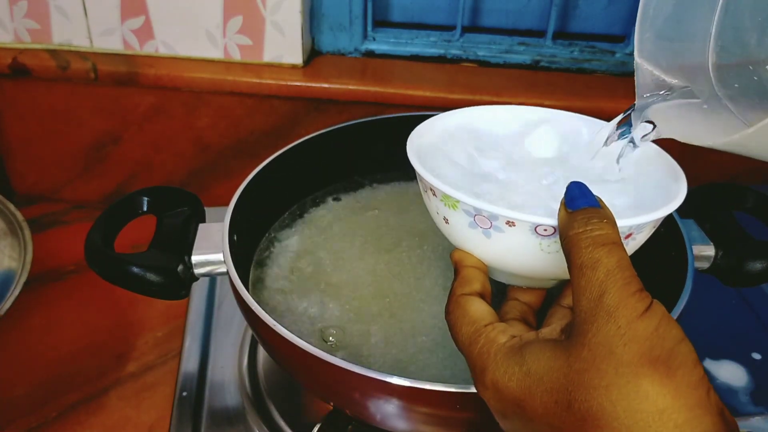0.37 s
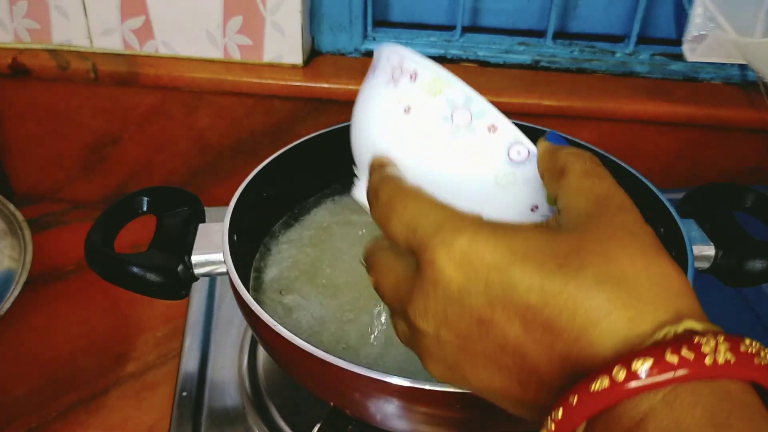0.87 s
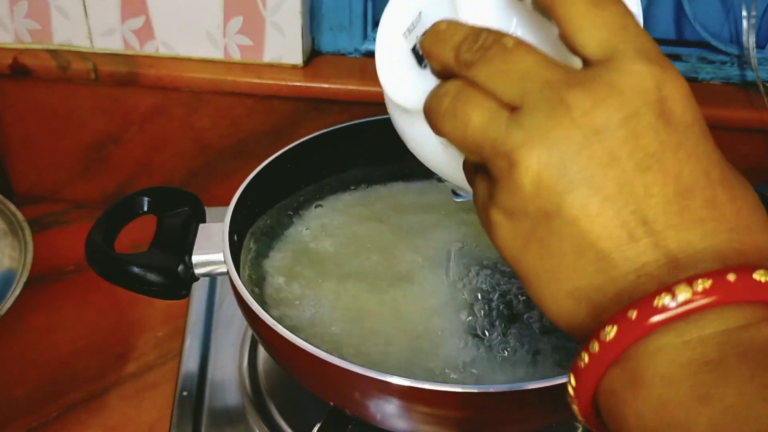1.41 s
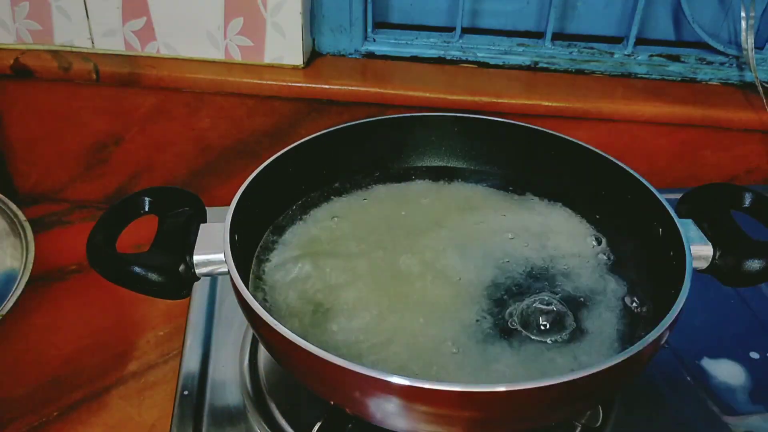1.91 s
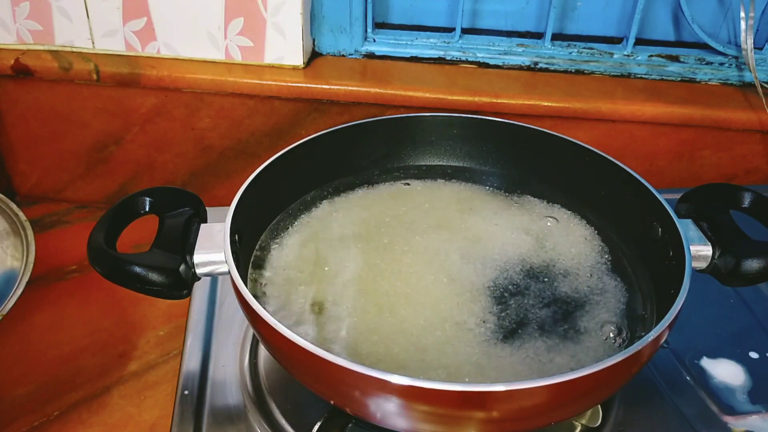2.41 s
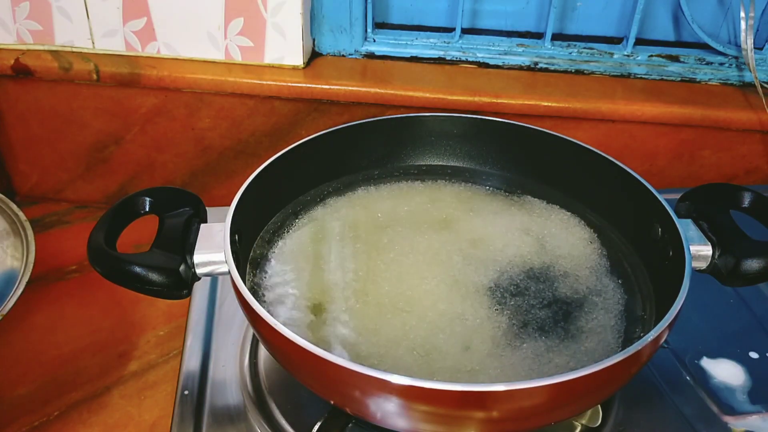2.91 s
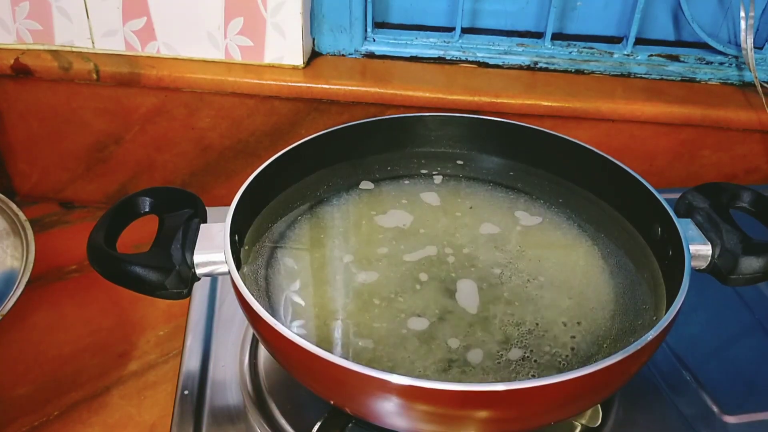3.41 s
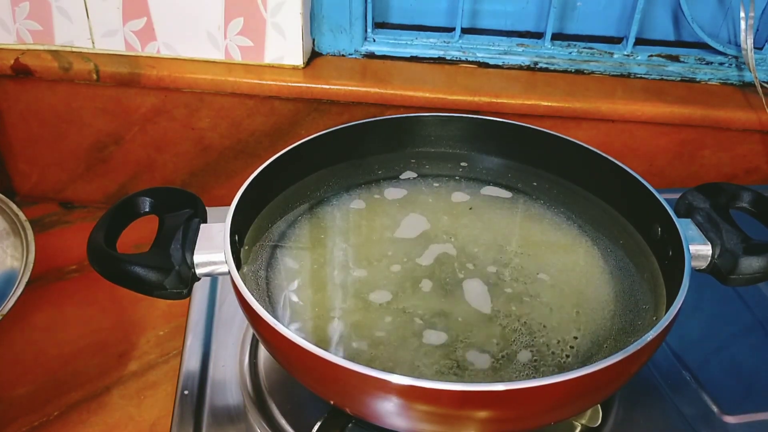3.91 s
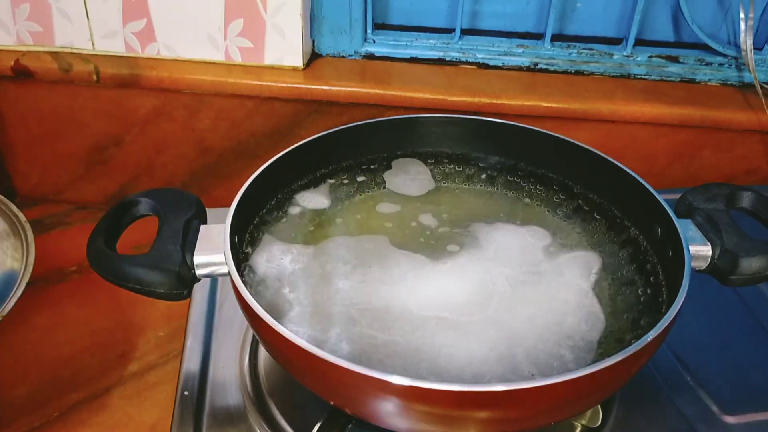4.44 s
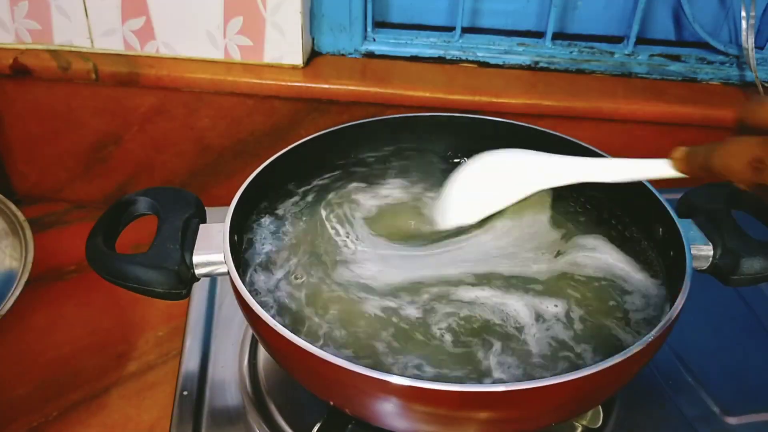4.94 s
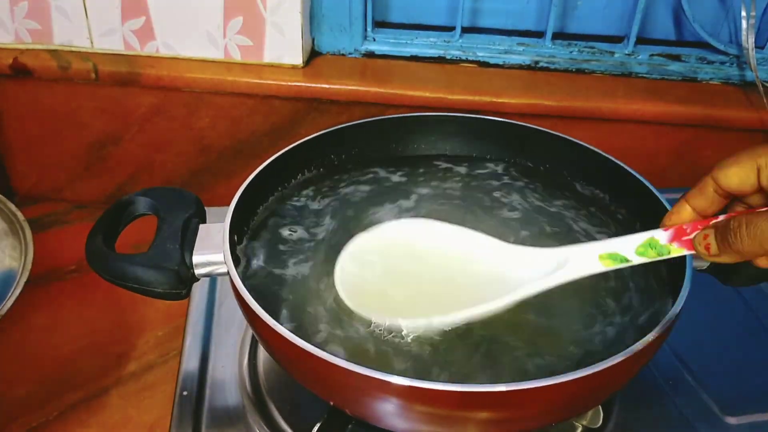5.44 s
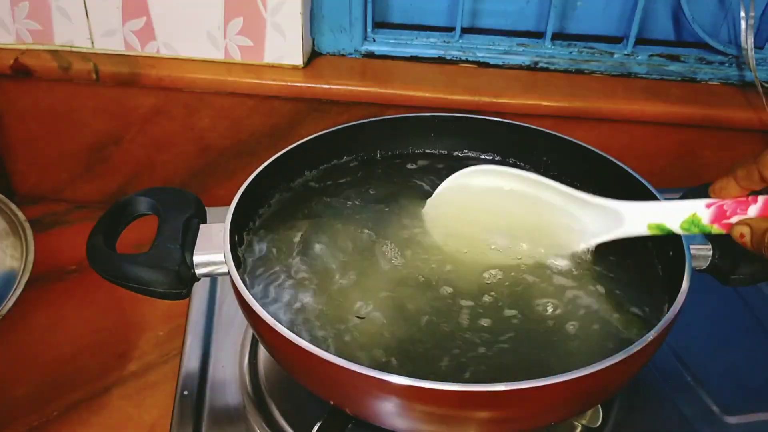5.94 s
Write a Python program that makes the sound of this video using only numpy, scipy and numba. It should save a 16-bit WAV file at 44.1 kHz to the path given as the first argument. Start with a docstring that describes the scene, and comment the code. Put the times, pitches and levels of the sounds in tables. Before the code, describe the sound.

Close in a small kitchen, a soft gurgling pour gives way to a bubbly splash as a bowl is tipped into a pan. A jug lands with a hollow thud, followed by sharp knocks after a tiny gap. Quiet murmur and faint insect hiss remain, with light rustling, before a plastic ladle scrapes and taps wet sugar on the pan floor.

```python
"""Water runs from a jug into a bowl, a stream of coloured noise and bubbles, and is tipped into a pan with a splash.
The jug lands with a hollow thud of decaying modes; small things knock, tick and rustle as shaped bursts of grit.
Then a plastic ladle scrapes wet sugar on the pan floor: grit rings pan and ladle, taps ring briefly, syrup bubbles.
Filtered-noise room murmur and throbbing insect hiss lie under it all, with one far bird note.
A cut between two shots near 2.2 s leaves a few milliseconds of silence."""
import sys
import numpy as np
from scipy import signal
from scipy.fft import rfft, irfft, next_fast_len
from scipy.io import wavfile
from scipy.ndimage import uniform_filter1d
from numba import njit

SR = 44100
rng = np.random.default_rng(int(sys.argv[2]) if len(sys.argv) > 2 else 0)


def to_linear_factor(level_db):
    """Convert decibel levels (scalar or array-like) to linear amplitude factors."""
    exponent = np.asarray(level_db, float) / 20
    return 10 ** exponent


def store_pcm(level_fs):
    """Save levels as 16-bit WAV."""
    pcm = np.round(np.clip(level_fs, -1, 1) * 32767).astype(np.int16)
    wavfile.write(sys.argv[1], SR, np.atleast_2d(pcm).T)


N = 267687
T = np.arange(N) / SR

# room murmur: t/s, gain/dB
ROOM_GAIN = [(0, -53), (1.7, -47), (2.17, -47), (2.4, -49), (2.55, -50), (2.9, -52.5), (3.3, -53.5),
             (4.1, -54.5), (4.6, -57.5), (5.5, -55), (6.07, -55.5)]
# murmur spectrum: f/Hz, relative gain/dB
ROOM_COLOUR = [(25, -28.5), (55, -9), (90, 1.5), (120, 2), (160, 0.5), (215, -2), (290, 2.5), (400, -7.5),
               (600, -5.5), (1000, -13), (2000, -16), (4000, -23), (16000, -24.5)]
# insect bands: f/Hz, width of each of two resonances/Hz, rms level/dB
INSECTS = [(6883, 500, -60), (5140, 790, -68), (11100, 990, -71)]
INSECT_THROB_HZ, INSECT_PULSE_HZ, INSECT_DEPTH_DB = 16, 31, 3.5
# far bird note: t/s, f/Hz, peak level/dB, length/s
BIRD_NOTES = [(2.809, 3365, -50.5, 0.034)]
# knocks of small things on the counter: t/s, gain/dB, main ring f/Hz, edge re gain/dB, swell scale/s
KNOCKS = [(2.115, -53, 1250, -0.5, 0.022), (2.204, -44.5, 1720, -13, 0.026),
          (2.219, -38.5, 1370, -14.5, 0.037), (2.287, -28.5, 1320, -39, 0.028),
          (2.313, -40, 1290, -30, 0.024), (2.329, -42, 748, -16, .023), (2.448, -50.5, 3440, 5, 0.015),
          (2.706, -58, 1140, 1, .027), (3.008, -60, 1010, -1.5, 0.038), (3.334, -47, 1190, -11.5, 0.023),
          (3.408, -62, 1270, -12, 0.014)]
KNOCK_BODY_DB, KNOCK_BODY_SLOPE = 1, -0.32  # body re ring at -57 dB; dB per dB louder
# rustles of cloth or paper: t/s, gain/dB
RUSTLES = [(3.462, -65), (3.491, -51.5), (3.541, -50), (3.565, -49), (3.61, -49), (3.642, -53.5),
           (3.686, -54.5), (3.736, -53), (3.778, -58), (3.821, -59), (3.892, -51.5), (3.932, -53.5),
           (4.004, -60), (4.075, -63.5), (4.175, -61.5)]
RUSTLE_SCALE_S, RUSTLE_HZ, RUSTLE_BODY_DB, RUSTLE_EDGE_DB = 0.041, 2150, -1.5, -1.6
# short rings of hard things touching: t/s, peak level/dB, f/Hz, ring length/cycles
TICKS = [(2.116, -35.5, 825, 5.2), (2.123, -24.5, 3500, 3.1), (2.218, -15.5, 485, 12.1),
         (2.297, -10.5, 1350, 3), (2.304, -16.5, 1500, 9.5), (2.338, -21.5, 420, 4.2),
         (2.449, -38, 8440, 44), (2.457, -35, 3600, 4.8), (2.457, -29, 8740, 92), (2.735, -39, 229, 13),
         (3.338, -26.5, 1200, 0.76), (5.591, -28, 8500, 3.8)]
# brief 35 ms puff of hiss late in the rustling: start/s, end/s, rms level before flutter/dB
PUFF = (4, 4.035, -60.5)
# grit and spray spectrum above the main rings: f/Hz, relative gain/dB
EDGE_COLOUR = [(1500, -69), (2600, 11), (4000, 10), (16000, 1)]
# cut between two shots: silence starts/s, silent until/s, fully back/s
CUT = (2.180, 2.187, 2.196)
THUD_S, JUG_DB = 1.7215, -8.5
# jug and counter-top modes: f/Hz, level re JUG_DB/dB, t60/s
JUG_MODES = [(93.3, -13, 0.49), (153.7, -10, 0.21), (194, -9.5, 0.14), (254.4, -13.5, 0.36),
             (283, 3.5, 0.26), (306, -9.5, 0.25), (332, -2.5, 0.13), (458, -13.5, 0.15), (563, -27, 0.45),
             (715, -17.5, 0.27), (887, -21, .2), (1120, -31, 0.074), (1385, -19, 0.12),
             (1800, -16.5, 0.041), (2880, -10.5, 0.019)]
# room answer to the thud: f/Hz, width before scaling/Hz, initial level/dB, t60/s
THUD_TAIL = [(100, 11, -29, 0.25), (159, 42, -20.5, 0.43), (275, 30, -31.5, 1.28), (570, 360, -26.5, 0.42),
             (1200, 770, -26.5, 0.29), (2600, 6600, -27.5, 0.075), (8500, 5500, -40.5, 0.07),
             (13900, 7100, -40, 0.65)]
# stream of water: t/s, gain/dB
POUR_GAIN = [(0.0, -43), (0.35, -47), (0.78, -48), (0.98, -42), (1.14, -42.5), (1.47, -50.5), (2.17, -55)]
# rush spectrum: f/Hz, relative gain/dB
RUSH_COLOUR = [(25, -54), (58, -35), (88, 8), (120, -14.5), (165, 8), (215, -9.5), (285, 5), (550, -7.5),
               (1100, -3.5), (1800, -11.5), (3000, -14), (4500, -21), (16000, -20)]
POURING_S, TIPPING_S, STIRRING_S = (0, 2.18), (0.78, 1.62), (4.6, 6.07)  # start, end
GURGLE_DB = -8.5
# surges as the bowl tips: t/s, peak gain/dB, fade/(dB/s)
SURGES = [(.799, -39.5, 63), (0.829, -30, 109), (.865, -37, 138), (.90, -45, 106), (0.954, -36, 208),
          (1.047, -40, 90), (1.13, -46.5, 45), (1.281, -40.5, 147), (1.359, -49.5, 58)]
SURGE_ATTACK_S, SPRAY_DB = 0.0052, -7
# pan resonances under the falling water: f/Hz, width/Hz, gain/dB
PAN_MODES = [(780, 230, 7), (1500, 150, 5.5), (2100, 310, 12), (2880, 180, -1), (3360, 200, 6)]
# single clear bubbles: t/s, peak level/dB, f/Hz, ring length/cycles
BUBBLES = [(.80, -32.5, 1500, 45), (.818, -34, 2700, 57), (.82, -34, 3570, 66), (.845, -34, 2030, 37),
           (.855, -28.5, 2850, 43), (.86, -37, 810, 16), (.895, -32, 2100, 66), (.93, -30.5, 1600, 17),
           (.96, -30, 1500, 13), (.963, -33.5, 4860, 55), (1.015, -34, 2600, 18), (1.048, -35, 732, 49),
           (1.049, -33.5, 3390, 84), (1.075, -38, 824, 26), (1.10, -36, 2600, 18), (1.11, -34, 4970, 70),
           (1.16, -38.5, 767, 33), (1.197, -31.5, 6600, 23), (1.195, -32, 1090, 4.8),
           (1.22, -31, 1200, 4.9), (1.27, -38, 2100, 45), (1.345, -40, 2100, 25), (1.53, -42, 1100, 3.6),
           (1.254, -29.5, 2150, 37), (1.295, -35.5, 3630, 97), (1.30, -36, 2110, 40), (1.41, -35, 1200, 10),
           (1.439, -30.5, 1200, 4.4), (1.576, -35.5, 1060, 3.3), (1.602, -39, 1100, 7.4),
           (5.631, -32.5, 529, 13.6), (5.685, -44, 2600, 39)]
# droplets spattering near the microphone: t/s, peak level/dB
SPATTER = [(.843, -27), (.856, -23), (0.875, -20), (.90, -32), (.914, -35), (.961, -36), (0.985, -33),
           (1.05, -29), (1.163, -33), (1.377, -44)]
SPATTER_HZ, SPATTER_CYCLES = 8500, 17
# syrup moving round the ladle: start/s, length/s, gain/dB
SLOSHES = [(4.812, 0.31, -46), (5.125, 0.32, -47.5), (5.556, 0.201, -57)]
SLOSH_RAMP_S, WASH_DB = 0.013, -4
# ladle and pan-floor resonances: f/Hz, width/Hz, gain/dB
LADLE_MODES = [(920, 39, -10), (1200, 14, -6), (1493, 20, -1.5), (1700, 38, -4), (1800, 74, -1),
               (2700, 320, 6.5)]
# ladle strokes, dry grit bright, wet dull: t/s, gain/dB, swell scale/s, edge re gain/dB
STROKES = [(4.616, -44, 0.034, -8), (4.642, -31.5, .015, -7), (4.654, -40, 0.023, -9.5),
           (4.712, -61, .017, -4), (4.819, -46, 0.025, -8.5), (4.847, -36, 0.033, -38),
           (4.866, -33.5, 0.011, -12.5), (4.88, -27, 0.011, -26), (4.889, -44, 0.02, -11),
           (4.938, -40.5, 0.052, -18.5), (4.985, -50.5, 0.036, -19), (5.025, -44, 0.049, -26),
           (5.048, -28.5, 0.022, -7.5), (5.067, -32.5, 0.0098, -3.5), (5.084, -31, 0.013, -33),
           (5.124, -34.5, .016, -16.5), (5.144, -27, .015, -9), (5.161, -26.5, 0.014, -15),
           (5.174, -28, 0.024, -17), (5.209, -29.5, 0.027, -27), (5.24, -49, 0.062, -20),
           (5.284, -28.5, .011, -19), (5.292, -20.5, .011, -9), (5.303, -28, .019, -13.5),
           (5.355, -37, 0.025, -26), (5.385, -43.5, 0.016, -8), (5.402, -40, 0.011, -13),
           (5.424, -53, 0.028, -33), (5.481, -57, 0.012, -1.5), (5.5, -60, 0.0087, -8),
           (5.547, -61, .012, -4), (5.585, -67, 0.015, 6), (5.637, -50.5, 0.031, -8),
           (5.665, -56.5, 0.037, 3.5), (5.735, -57.5, 0.019, -3.5), (5.87, -60, 0.018, -12),
           (5.89, -52, .015, -3.5), (5.948, -49, 0.036, -13)]
STROKE_HZ, STROKE_HZ_PER_DB = 1650, 17  # ring at 0 dB edge; brighter strokes ring higher
STROKE_BODY_DB, STROKE_BODY_SLOPE = -3, -0.25  # body re ring at -50 dB; dB per dB louder
# ladle strikes on the pan floor: t/s, peak level/dB, f/Hz, ring length/cycles
TAPS = [(4.644, -15, 1700, 1.2), (4.8816, -14, 1500, 2.5), (4.941, -28.5, 1450, 7.4),
        (5.0946, -13.5, 1340, 3.8), (5.124, -30, 1750, 5), (5.148, -15.5, 1800, 8.7),
        (5.163, -24, 1700, 18), (5.18, -18.5, 1650, 15), (5.217, -20.5, 1540, 20), (5.294, -8.5, 1960, 4.8),
        (5.31, -12, 1500, 2), (5.360, -34.5, 1800, 43), (5.894, -34.5, 2240, 11), (5.950, -35, 1870, 5.7)]
# microphone and its port: f/Hz, gain/dB
MIC_RESPONSE = [(30, -3), (65, -2.5), (95, -0.1), (3000, -0.5), (4200, -6), (5200, -5), (7600, -2),
                (8600, 3.5), (10000, -6), (12500, -9.5), (15500, 0), (15850, 3), (16100, -50)]


def level(x, db=0):
    """Scale to an rms level."""
    return x * to_linear_factor(db) / np.sqrt(np.mean(x ** 2))


def curve(rows):
    """Columns of a table joined by straight lines in time."""
    s, *columns = np.transpose(rows)
    return [np.interp(T, s, c) for c in columns]


def colour(x, points):
    """Filter by (Hz, dB) points, straight lines over log frequency."""
    n = next_fast_len(len(x), real=True)
    f = np.maximum(np.fft.rfftfreq(n, 1 / SR), 1)
    hz, db = np.transpose(points)
    gain = to_linear_factor(np.interp(np.log(f), np.log(hz), db))
    return irfft(rfft(x, n) * gain, n)[:len(x)]


def ring(x, hz, width):
    """One resonance, gain 1 at its centre."""
    return signal.lfilter(*signal.iirpeak(hz, hz / width, SR), x)


def ring_twice(x, hz, width):
    """Two equal resonances in series: steeper skirts."""
    return ring(ring(x, hz, width), hz, width)


def with_modes(x, modes):
    """Add the resonances that x excites."""
    return x + sum(to_linear_factor(db) * ring(x, hz, width) for hz, width, db in modes)


def walk(rate_hz):
    """Random levels held 1 / rate_hz s and slewed twice; spread near 1."""
    k = int(SR / rate_hz)
    held = np.repeat(rng.standard_normal(N // k + 1), k)
    return 1.344 * uniform_filter1d(uniform_filter1d(held, k), k)[:N]


def grit(spread_db):
    """Dense clicks, a few much larger than the rest."""
    return level(rng.standard_normal(N) * to_linear_factor(spread_db * np.minimum(rng.exponential(size=N), 6)))


@njit
def grains(start, hz, cycles, size, glide, length):
    """Each grain swells to its peak size, then rings down while its pitch slides up."""
    out = np.zeros(length)
    for g in range(len(start)):
        phase, fade = 0., 3 * hz[g] / cycles[g] / SR
        for i in range(min(int(6 / fade), length - start[g])):
            age = i * fade
            phase += 2 * np.pi * hz[g] * (1 + glide * age) / SR
            envelope = (1.5 * age) ** 2 * np.exp(2 - 3 * age)
            out[start[g] + i] += size[g] * envelope * np.sin(phase)
    return out


def pops(rows):
    """Listed short rings, each at its own pitch."""
    s, db, hz, cycles = np.transpose(rows)
    return grains((s * SR).astype(np.int64), hz, cycles, to_linear_factor(db), 0.0043, N)


def bubbling(span, per_s, low_hz, high_hz, cycles, spread_db):
    """A random crowd of bubbles between two times, rms near 1."""
    begin, end = span
    u = rng.random(size=(int(per_s * (end - begin)), 4)).T
    start = ((begin + u[0] * (end - begin)) * SR).astype(np.int64)
    hz = low_hz * (high_hz / low_hz) ** u[1]
    size = to_linear_factor(spread_db * np.minimum(-np.log(u[3]), 4))
    x = grains(start, hz, cycles * (0.5 + u[2]), size, 0.014, N)
    return x / np.sqrt(np.mean(x[(T > begin) & (T < end)] ** 2))


def bursts(rows, spread_db, width, body_hz, body_width, skew, modes=()):
    """Contacts: swells of grit excite a main ring and sharp modes, over a low body and a hissing edge."""
    rub = grit(spread_db)
    edge = level(colour(rub, EDGE_COLOUR), 2.97)
    body = level(ring_twice(rub, body_hz, body_width))
    out = np.zeros(N)
    for s, db, hz, body_db, edge_db, scale_s in rows:
        span = slice(int(s * SR), min(int((s + scale_s + 0.041) * SR), N))
        u = np.maximum(T[span] - s, 0) / scale_s
        tail = 0.15 * np.exp(-u * scale_s / 0.021)
        swell = np.sin(np.pi * np.minimum(u / 1.213, 1) ** skew) + tail
        main = ring_twice(swell * rub[span], hz, width) / np.sqrt(np.pi * width / SR / 2)
        # dull above the ring
        main = signal.sosfilt(signal.butter(2, 1.13 * hz, fs=SR, output="sos"), main)
        main = with_modes(main, modes)
        rest = to_linear_factor(body_db) * body[span] + to_linear_factor(edge_db) * edge[span]
        out[span] += to_linear_factor(db + 1.5) * (main + swell * rest)
    return out


def room():
    """Coloured-noise murmur; lows and treble flicker separately."""
    murmur = level(colour(rng.standard_normal(N), ROOM_COLOUR))
    high = signal.sosfilt(signal.butter(2, 900, "high", fs=SR, output="sos"), murmur)
    low_flicker, high_flicker = to_linear_factor(1.5 * walk(9)), to_linear_factor(0.8 * walk(12))
    return to_linear_factor(curve(ROOM_GAIN)[0]) * ((murmur - high) * low_flicker + high * high_flicker)


def insects():
    """Narrow noise bands share a throb and a weaker pulse, both of wandering rate."""
    throb_phase = 2 * np.pi * np.cumsum(INSECT_THROB_HZ * (1 + 0.0777 * walk(1.58))) / SR
    pulse_phase = 2 * np.pi * np.cumsum(INSECT_PULSE_HZ * (1 + 0.0853 * walk(5))) / SR
    gain = to_linear_factor(INSECT_DEPTH_DB * (np.sin(throb_phase) + 0.52 * np.sin(pulse_phase)))
    return sum(level(gain * ring_twice(rng.standard_normal(N), hz, width), db) for hz, width, db in INSECTS)


def bird():
    """A short, steady sine whistle under a rounded envelope."""
    out = np.zeros(N)
    for s, hz, db, length_s in BIRD_NOTES:
        envelope = np.sin(np.pi * np.clip((T - s) / length_s, 0, 1)) ** 0.4
        out += to_linear_factor(db) * envelope * np.sin(2 * np.pi * hz * T)
    return out


def counter():
    """Knocks, ticks, rustles and one brief puff of hiss around the stove, from rung and coloured grit."""
    knocks = [(s, db, hz, KNOCK_BODY_DB + KNOCK_BODY_SLOPE * (db + 57), edge_db, scale_s)
              for s, db, hz, edge_db, scale_s in KNOCKS]
    rustles = [(s, db, RUSTLE_HZ, RUSTLE_BODY_DB, RUSTLE_EDGE_DB, RUSTLE_SCALE_S) for s, db in RUSTLES]
    begin, end, puff_db = PUFF
    puff = ((T > begin) & (T < end)) * to_linear_factor(1.2 * walk(29.6)) * level(colour(grit(1.1), EDGE_COLOUR), puff_db)
    return (bursts(knocks, spread_db=4.0, width=1400, body_hz=495, body_width=380, skew=0.78)
            + bursts(rustles, spread_db=2.0, width=6900, body_hz=104, body_width=90, skew=0.52)
            + pops(TICKS) + puff)


def thud():
    """The jug lands in two quick contacts; its hollow modes bloom and the room answers."""
    t = np.arange(SR) / SR
    out = np.zeros(SR)
    for hz, db, t60 in JUG_MODES:
        bloom = 1 - np.exp(-t * hz / 1.43)  # low modes build up more slowly
        out += to_linear_factor(JUG_DB + db - 60 * t / t60) * bloom * np.sin(2 * np.pi * hz * t)
    for hz, width, db, t60 in THUD_TAIL:
        noise = ring(ring(rng.standard_normal(SR), hz, 2.46 * width), hz, 2.5 * width)
        out += to_linear_factor(db - 60 * t / t60) * level(noise)
    for contact_s in (0.0008, 0.00361):
        u = (t - contact_s) / 0.00019
        out += to_linear_factor(-14.5) * (1 - u * u) * np.exp(-u * u / 2)
    start = int(THUD_S * SR)
    return (T < CUT[1]) * np.pad(out, (start, N - start - SR))  # tail stops at the cut


def stream():
    """Pouring water: a smooth rush of coloured grit and low gurgling bubbles."""
    rush = to_linear_factor(2.5 + 0.33 * walk(11.14)) * level(colour(grit(1.6), RUSH_COLOUR))
    gurgle = to_linear_factor(GURGLE_DB) * bubbling(POURING_S, 300, 153, 1245, 4.4, 2.3)
    return (T < POURING_S[1]) * to_linear_factor(curve(POUR_GAIN)[0]) * (rush + gurgle)


def surges():
    """Each surge rises quickly and fades; their powers add."""
    power = np.zeros(N)
    for s, db, fade in SURGES:
        attack = np.clip((T - s) / SURGE_ATTACK_S, 0, 1)
        power += (attack * to_linear_factor(db - fade * np.maximum(T - s, 0))) ** 2
    return np.sqrt(power)


def splash():
    """Tipped water: surges of bubbles, froth that rings the pan, and bright spray."""
    mist = to_linear_factor(3.5 + 3.7 * walk(110)) * level(colour(grit(1.7), EDGE_COLOUR))
    froth = to_linear_factor(-8.0 + 2.2 * walk(69.46)) * bubbling(TIPPING_S, 3000, 753, 3870, 3.5, 1.9)
    froth = with_modes(froth, PAN_MODES)
    spray = to_linear_factor(SPRAY_DB) * (mist + to_linear_factor(-0.5) * bubbling(TIPPING_S, 500, 4450, 12100, 23, 2.4))
    long_bubbles = to_linear_factor(-7.5) * bubbling(TIPPING_S, 600, 755, 3860, 20.0, 3.2)
    return surges() * (long_bubbles + froth + spray)


def drops():
    """Clear bubbles and spattering droplets, each a short gliding ring."""
    return pops(BUBBLES) + pops([(s, db, SPATTER_HZ, SPATTER_CYCLES) for s, db in SPATTER])


def syrup():
    """Stirred syrup: bubbles ring the ladle and pan floor over a noise wash."""
    stirring = sum(to_linear_factor(db) * np.clip(np.minimum(T - s, s + length_s - T) / SLOSH_RAMP_S, 0, 1)
                   for s, length_s, db in SLOSHES)
    slosh = with_modes(bubbling(STIRRING_S, 500, 239, 2020, 6.2, 4.7), LADLE_MODES)
    wash = level(colour(rng.standard_normal(N), RUSH_COLOUR), WASH_DB)
    return stirring * (slosh + wash)


def ladle():
    """Strokes grind the sugar; the pan's low body grows less than the ring; taps hit the floor."""
    strokes = [(s, db, STROKE_HZ + STROKE_HZ_PER_DB * edge_db,
                STROKE_BODY_DB + STROKE_BODY_SLOPE * (db + 50), edge_db, scale_s)
               for s, db, scale_s, edge_db in STROKES]
    scrape = bursts(strokes, spread_db=2.5, width=1470, body_hz=309.0, body_width=148, skew=0.77,
                    modes=LADLE_MODES)
    return scrape + pops(TAPS)


def scene():
    """All sources sum at one microphone."""
    background = room() + insects() + bird()
    water = stream() + splash() + drops() + syrup()
    return (background + counter() + thud() + water + ladle())[None]


def band_limit(x):
    """A steep low-pass at the top of the band."""
    return signal.sosfilt(signal.butter(12, 16920, fs=SR, output="sos"), x)


def record(dry):
    """The microphone and its port colour the sound; the cut leaves a few milliseconds of silence."""
    silent_from, silent_until, back = CUT
    keep = np.interp(T, [silent_from - 0.001, silent_from, silent_until, back], [1, 0, 0, 1])
    mix = keep * colour(dry[0], MIC_RESPONSE)[None]
    return band_limit(mix)


dry = scene()
out = record(dry)
store_pcm(out)
```